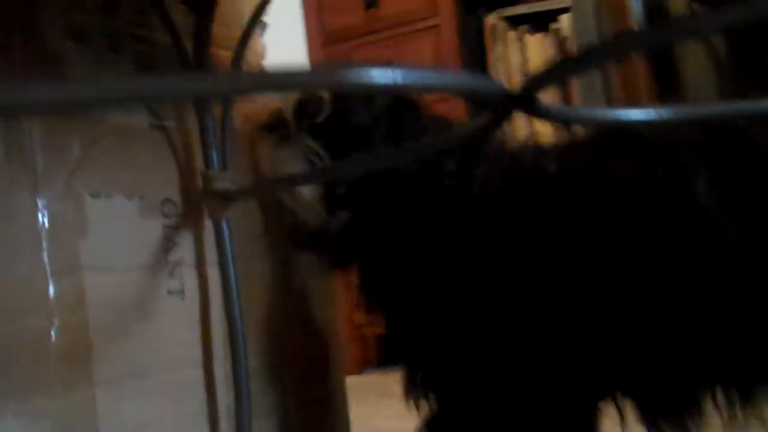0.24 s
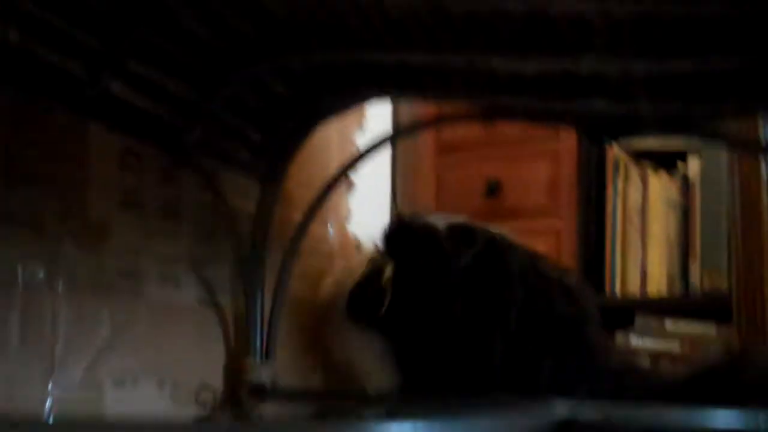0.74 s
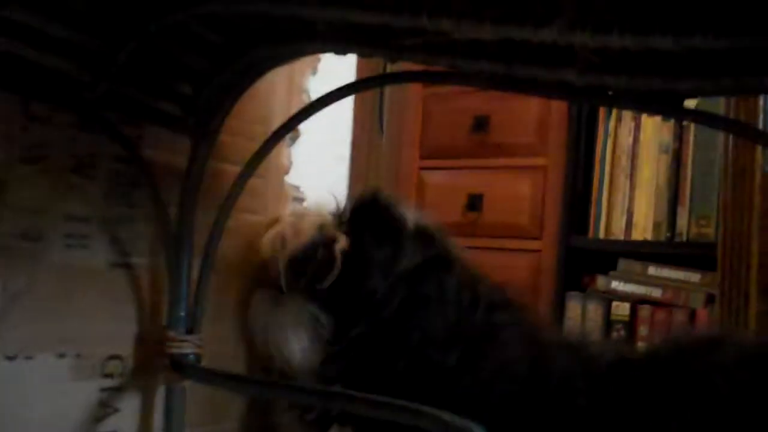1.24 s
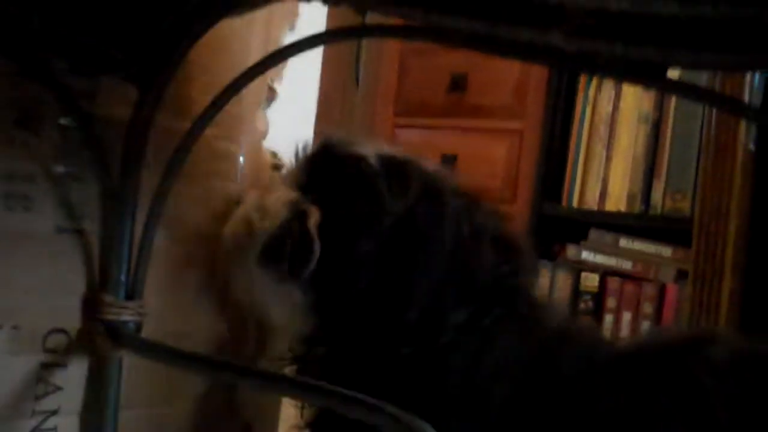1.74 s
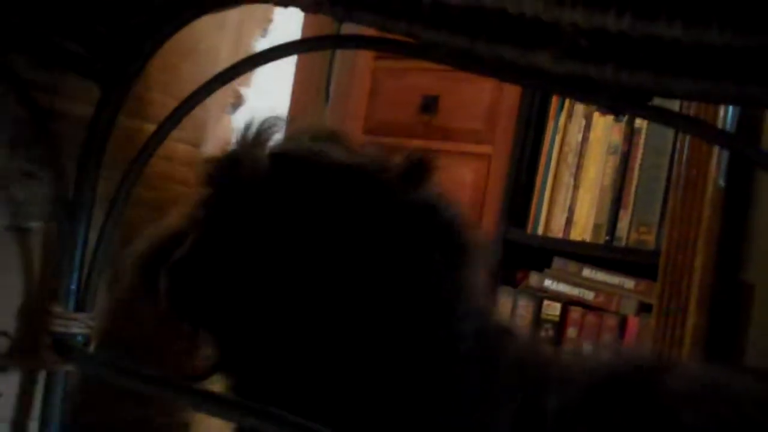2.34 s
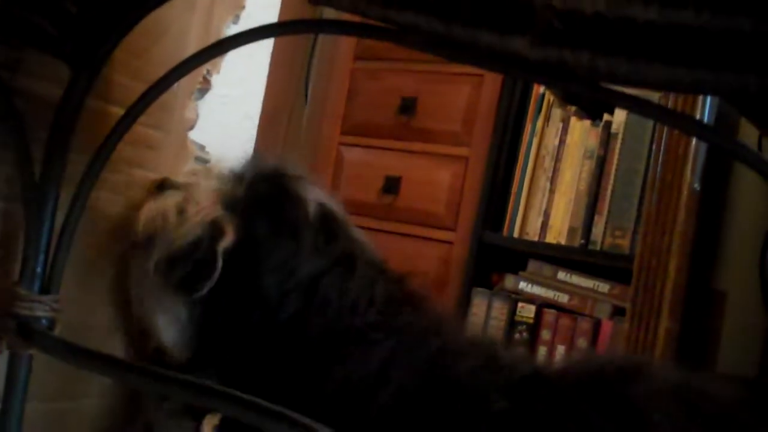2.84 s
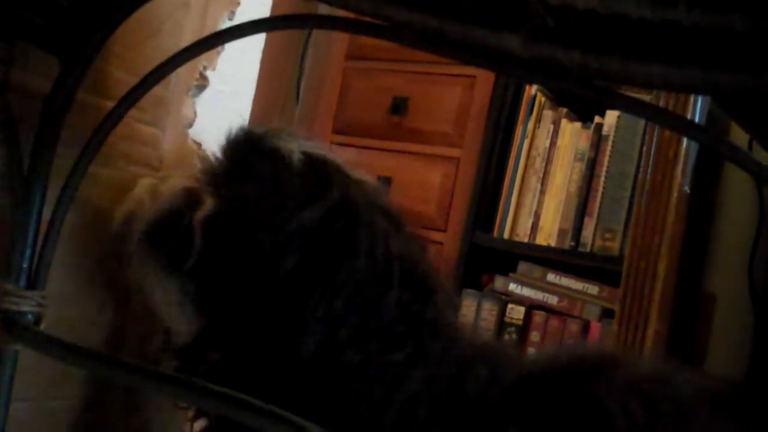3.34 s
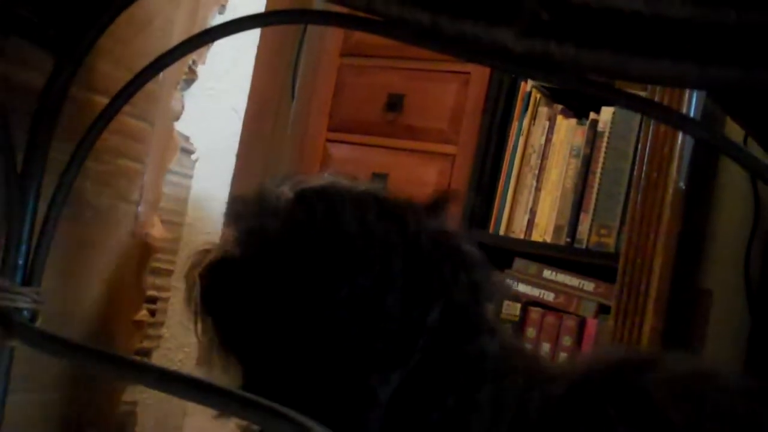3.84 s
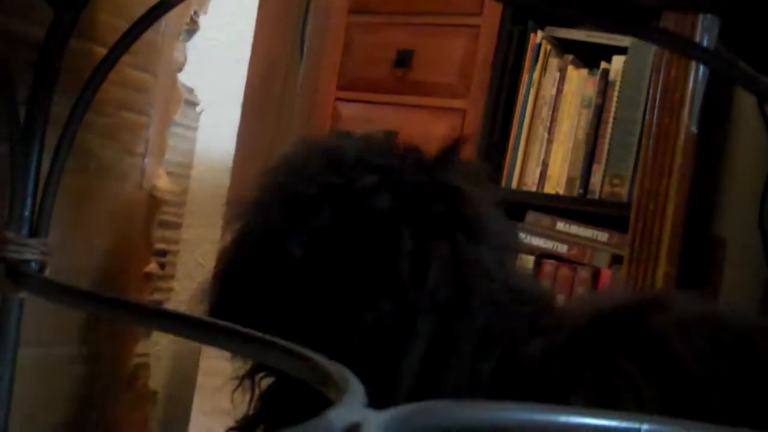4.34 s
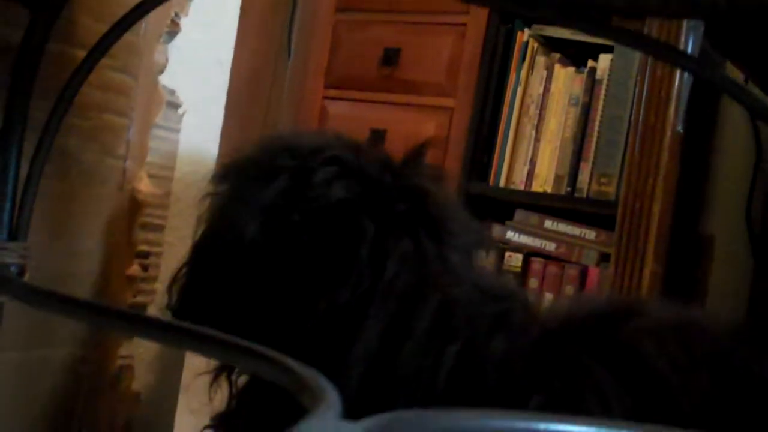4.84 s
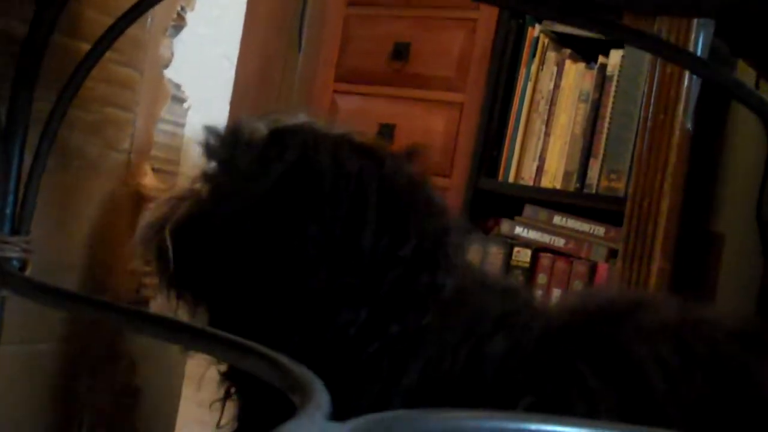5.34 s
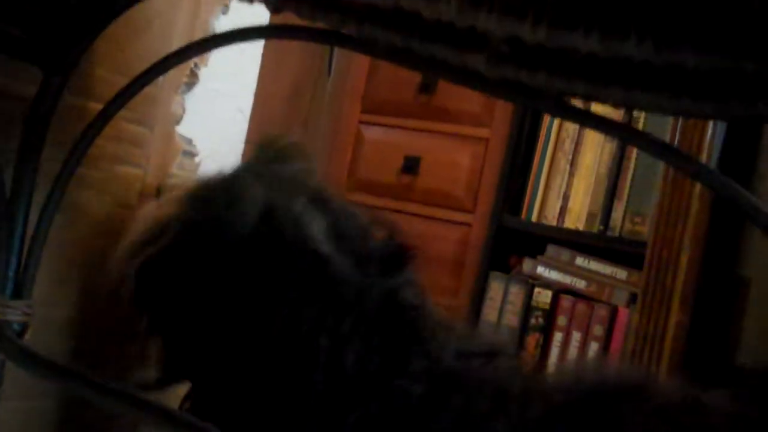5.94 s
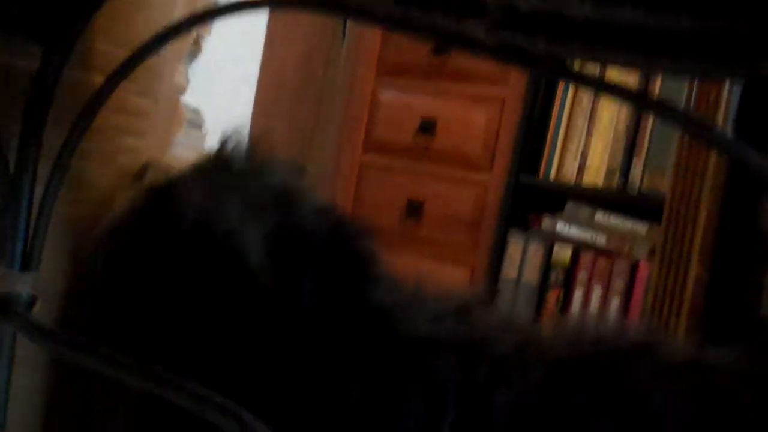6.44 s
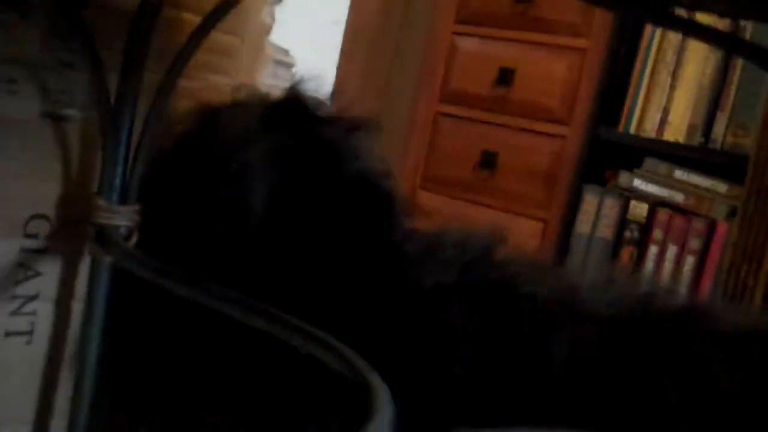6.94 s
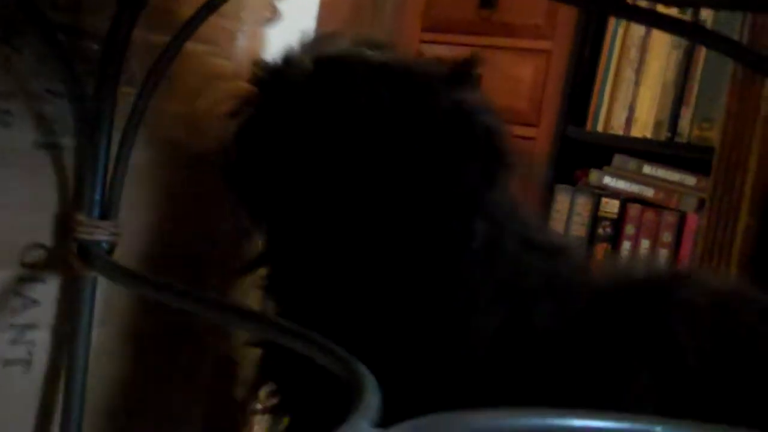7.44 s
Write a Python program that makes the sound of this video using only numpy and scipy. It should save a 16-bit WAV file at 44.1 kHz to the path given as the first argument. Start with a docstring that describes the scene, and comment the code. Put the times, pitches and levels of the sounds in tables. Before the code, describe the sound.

Close, crisp cardboard chewing indoors: bright fibre crackle, short coarse rips, brittle snaps with a brief woody ring, low wall rumble and a few springing panel thuds. Bites are uneven, busiest around two seconds and in the last half second, with only faint ticks through the middle. The room is dry with a very short echo, and the treble-heavy microphones add steady hiss. The box sits slightly left.

```python
"""Puppy chewing a cardboard box

A puppy gnaws and tears at the edge of a big corrugated box in a quiet furnished room, close to two bright,
resonant microphones. Random grains, filtered and driven by the effort of the jaw, make the fibre crackle,
the rips and the rumble of the wall. Noise bursts with short rings make the snapping flutes; decaying sines
make flakes, springing panels and knocks; resonant noise makes rubs. Echoes, room air, hum and hiss surround them."""
import sys
import numpy as np
from scipy import signal
from scipy.fft import rfft, irfft
from scipy.io import wavfile

SR = 44100
rng = np.random.default_rng(int(sys.argv[2]) if len(sys.argv) > 2 else 0)


def generate_wav(signal):
    """Clip the signal to [-1, 1] and save it as 16-bit WAV at the path in sys.argv[1]."""
    frames = np.transpose(np.atleast_2d(signal))
    scaled = np.clip(frames, -1, 1) * 32767
    pcm = np.round(scaled).astype(np.int16)
    wavfile.write(sys.argv[1], SR, pcm)


N = 339113

# bites and pulls on the edge, levels before each layer's trim:
# start_s (of the hold), hold_s, crackle_db, ripping_db, rumble_db
JAW_PULLS = [(0.264, 0.012, -66, -57.5, -62.5), (0.47, 0.024, -48.5, -48, -51),
             (0.688, 0.12, -49.5, -55, -80), (0.939, 0.0073, -39, -48, -50.5),
             (1.049, 0.046, -67, -55, -55.5), (1.466, 0.025, -50, -49.5, -51),
             (1.744, 0.054, -41.5, -49, -60), (1.811, 0.053, -40.5, -48, -54.5),
             (1.937, 0.084, -42, -52, -53.5), (2.103, 0.063, -38, -51.5, -51.5),
             (2.25, 0.018, -39.5, -45, -47), (2.283, 0.076, -26.5, -33.5, -46),
             (2.412, 0.042, -32, -40.5, -45), (2.583, 0.039, -59, -61, -56.5),
             (2.96, 0.051, -50, -57.5, -58), (3.07, 0.097, -52.5, -62.5, -78),
             (3.293, 0.026, -40, -46.5, -66), (3.565, 0.034, -40, -38, -45.5),
             (3.914, 0.076, -53, -69, -85), (4.115, 0.097, -54.5, -66, -82), (4.406, 0.036, -57, -64, -80),
             (4.667, 0.032, -52.5, -61.5, -77), (4.746, 0.098, -57, -74, -84),
             (5.199, 0.034, -51, -70, -81), (6.028, 0.021, -45.5, -55.5, -83),
             (6.129, 0.011, -50.5, -58, -65), (6.469, 0.027, -50, -57.5, -52),
             (6.626, 0.052, -42.5, -58, -58), (6.811, 0.063, -51, -60, -76),
             (6.927, 0.032, -46.5, -52.5, -51), (7, 0.044, -45, -53, -57), (7.18, 0.11, -43, -55.5, -55.5),
             (7.317, 0.043, -41.5, -45.5, -70), (7.381, 0.031, -34.5, -46, -44.5),
             (7.503, 0.13, -43.5, -53, -54.5)]


def from_db(db):
    """Decibels to gain."""
    return 10 ** (np.asarray(db) / 20)


def rms_one(x):
    """Scale to unit power."""
    return x / np.sqrt(np.mean(x ** 2) + 1e-20)


def in_time(rows):
    """Each column of a curve at every sample."""
    s, *columns = np.transpose(rows)
    return [np.interp(np.arange(N) / SR, s, c) for c in columns]


def band(x, low_hz, high_hz, order=2):
    """Causal band-pass, with its edges kept inside the range that the filter allows."""
    edges = np.clip([low_hz, high_hz], 10, .45 * SR)
    return signal.sosfilt(signal.butter(order, edges, "band", fs=SR, output="sos"), x + 1e-18)


def dull(x, hz, order=1):
    """Causal low-pass."""
    return signal.sosfilt(signal.butter(order, min(hz, SR / 2 - 1), fs=SR, output="sos"), x + 1e-18)


def resonance(x, hz, width_hz):
    """Two-pole resonance with gain 1 on top."""
    r = np.exp(-np.pi * width_hz / SR)
    numerator = np.array([1, 0, -1]) * (1 - r * r) / 2
    denominator = [1, -2 * r * np.cos(2 * np.pi * hz / SR), r * r]
    return signal.lfilter(numerator, denominator, x + 1e-18)


def drift(per_s):
    """Smooth random wander of unit power through per_s new points a second."""
    points = rng.standard_normal(N // 20)
    return rms_one(np.interp(np.arange(N) / SR * per_s, np.arange(len(points)), points))


def add(track, s, sound):
    """Mix a sound in at a time in seconds."""
    at = round(s * SR)
    track[at:at + len(sound)] += sound[:N - at]


def grains(per_s, spread_db):
    """Random clicks of either sign, many small and a few large."""
    sizes = from_db(spread_db * np.minimum(rng.exponential(1, N), 4))
    struck = rng.random(N) < per_s / SR
    return struck * sizes * rng.choice([-1, 1], N) / np.sqrt(per_s)


def stillness(air_db=-62.5):
    """Room air is shaped noise, partly shared by both sides; the mains hum is a steady sine."""
    # spectrum of the air before it is set to air_db: pitch_hz, density_db (per Hz)
    air_spectrum = [(20, 4.5), (60, -9.5), (123, -3.5), (160, -7.5), (380, -8.5), (700, -5.5), (1000, -10),
                    (5000, -22), (9000, -61)]
    # mains hum: pitch_hz, level_db (rms)
    hum_tones = [(120, -76)]
    hz = np.maximum(np.arange(N // 2 + 1) * SR / N, 1)
    point_hz, point_db = np.transpose(air_spectrum)
    noise = rng.standard_normal(N) + rng.standard_normal((2, N))
    colour = from_db(np.interp(np.log(hz), np.log(point_hz), point_db))
    air = irfft(rfft(noise) * colour, N)
    t = np.arange(N) / SR
    hum = sum(from_db(db) * np.sqrt(2) * np.sin(2 * np.pi * f * t) for f, db in hum_tones)
    return from_db(air_db) * rms_one(air) + hum


def room(x, wet_db=-14, early_db=-16, onset_s=0.00033, early_s=0.00096, low_db=3.0, low_t60_s=0.2, treble_t60_s=0.32):
    """Echoes: scatter off the box and nearby furniture, then a short tail whose lows both microphones mostly share."""
    t = np.arange(SR // 2) / SR
    shared = rng.standard_normal(len(t))
    sides, scatter = rng.standard_normal((2, 2, len(t)))
    low_fade = np.exp(-np.log(1000) * t / low_t60_s)
    treble_fade = np.exp(-np.log(1000) * t / treble_t60_s)
    lows = from_db(low_db) * band(shared + .5 * sides, 15, 2970) * low_fade
    highs = band(sides, 1350, 19200) * treble_fade
    tail = rms_one((lows + highs) * (1 - np.exp(-t / onset_s)))
    early = rms_one(band(scatter, 2100, 7500) * t * np.exp(-t / early_s))
    echoes = (from_db(wet_db) * tail + from_db(early_db) * early) / np.sqrt(len(t))
    return signal.fftconvolve(x, echoes, axes=1)[:, :N]


def effort(levels_db, gnaw_db, release_s, lag_s=0, attack_s=0.015):
    """Level in dB of one effect of the jaw: light nibbling plus a swell, hold and release for each pull."""
    # nibbling between the pulls: time_s, crackle_db (before the trim)
    nibbling = [(0, -53), (.14, -67.5), (.2, -59.5), (.85, -48.5), (1.3, -57.5), (1.7, -49.5), (2.2, -52.5),
                (3.24, -61), (3.5, -52.5), (3.74, -59), (4.1, -63), (4.55, -75.5), (5.9, -64), (6.23, -66),
                (6.42, -51), (6.78, -62), (7.2, -49), (7.69, -50.5)]
    t = np.arange(N) / SR - lag_s
    power = from_db(in_time(nibbling)[0] + gnaw_db) ** 2
    for (start, hold, *_), db in zip(JAW_PULLS, levels_db):
        before = np.maximum(start - t, 0) / attack_s
        after = np.maximum(t - start - hold, 0) / release_s
        power = power + from_db(db) ** 2 * np.exp(-2 * np.minimum(before + after, 20))
    return 10 * np.log10(power)


def wall(push):
    """The box wall rings in its damped modes."""
    # modes of the wall: pitch_hz, weight_db, t60_s
    wall_modes = [(64, -9.5, 0.16), (121, -14.5, 0.051), (206, -10, 0.029), (384, -17, 0.016),
                  (592, -15.5, 0.024), (1070, -14, 0.025)]
    ringing = 0
    for hz, db, t60 in wall_modes:
        width_hz = np.log(1000) / np.pi / t60
        ringing = ringing + from_db(db) * resonance(push, hz, width_hz) / np.sqrt(width_hz / SR)
    return ringing


def rumbling(jerk_db=3.5, rub_db=-5, sway_db=-1, level_db=-1.0):
    """Small jerks of the jaw shake the wall, sway the whole box and rub it on the floor."""
    jerks = grains(1200, spread_db=2.5) * from_db(jerk_db * drift(40))
    sway = from_db(sway_db) * rms_one(band(jerks, 35, 137))
    rub = from_db(rub_db) * rms_one(band(jerks, 79, 580))
    # the wall follows each pull slightly late and sways on after it
    pulls_db = [db for *_, db in JAW_PULLS]
    shaking_db = effort(pulls_db, gnaw_db=-13.5, release_s=0.057, lag_s=0.0013)
    return from_db(shaking_db + level_db) * rms_one(rms_one(wall(jerks)) + sway + rub)


def buckling(ring_db=-21, crunch=0.63):
    """The wall pops inwards: one short suck of air, roughened by creasing, then its modes ring."""
    # pops of the wall, before filtering: start_s, push_db, rise_s (time to the peak of the push)
    wall_pops = [(0.272, -38, 0.00019), (0.939, -25.5, 0.00055), (1.078, -34, 0.00019),
                 (1.612, -32, 0.00084), (1.91, -26.5, 0.00049), (2.165, -36, 0.00037),
                 (2.394, -34.5, 0.0017), (3.542, -36, 0.001), (3.557, -27.5, 0.00077),
                 (6.956, -30.5, 0.00012), (7.244, -26, 0.00041), (7.388, -19.5, 0.00039),
                 (7.401, -29, 0.00022)]
    push, t = np.zeros(N), np.arange(SR // 30) / SR
    creases = rng.standard_normal((len(wall_pops), len(t)))
    for (s, db, rise_s), crease in zip(wall_pops, creases):
        suck = -from_db(db) * t / rise_s * np.exp(1 - t / rise_s)
        add(push, s, suck * (1 + crunch * crease))
    return band(push, 187, 1600, order=1) + from_db(ring_db) * wall(push)


def thuds(cycles=1.22, taut=0.28):
    """A released panel swings for a few cycles; it starts taut and sharp, and its pitch sags as it slackens."""
    # flaps and panels springing back: start_s, level_db (of the swing at its start), slack_pitch_hz
    panels = [(.497, -40.5, 98), (1.617, -31.5, 195), (3.626, -44, 58), (6.4636, -35, 610),
              (6.505, -40.5, 58.4), (7.246, -32.5, 188), (7.401, -26.5, 116), (7.4735, -35.5, 192)]
    out, t = np.zeros(N), np.arange(SR // 4) / SR
    for s, db, hz in panels:
        swing = np.exp(-hz * t / cycles)
        phase = 2 * np.pi * np.cumsum(hz * (1 + taut * swing)) / SR
        add(out, s, from_db(db) * swing * np.sin(phase))
    return out


def rubs(rise_per_s=1.86, judder_db=2.2):
    """Board dragged over board or teeth sings for a moment at a rough pitch, which rises as the pull tightens."""
    # sticking and slipping, from groans and scrapes to squeaks:
    # middle_s, half_length_s, pitch_hz (at the middle), level_db, width_hz (of the narrower resonance)
    strokes = [(0.564, 0.066, 209, -53, 110), (1.559, 0.0062, 1830, -47.5, 1100),
               (1.601, 0.048, 190, -55, 160), (2.949, 0.028, 1360, -56, 90), (4.143, 0.013, 3700, -62, 800),
               (7.42, 0.018, 1400, -44.5, 1000)]
    t, out = np.arange(N) / SR, np.zeros(N)
    for s, length, hz, db, width_hz in strokes:
        judder = from_db(judder_db * drift(90))
        stroke = np.exp(-((t - s) / length) ** 2)
        tone = resonance(resonance(rng.standard_normal(N), hz, width_hz), hz, 2 * width_hz)
        # reading the tone ever faster makes its pitch climb
        rising = np.interp(t + rise_per_s / 2 * (t - s) ** 2, t, tone)
        out += from_db(db) * rms_one(stroke * judder * rising) * np.sqrt(np.mean(stroke ** 2))
    return out


def clacks(chatter=0.34, chatter_s=0.0034):
    """The released edge chatters against the teeth and gives a dull, woody knock, different each time."""
    # teeth slipping off the stiff edge: start_s, level_db (before the weight of each mode)
    slips = [(1.7465, -42.5), (1.78, -31), (2.794, -41), (3.3136, -34), (3.567, -31), (7.4003, -16)]
    # modes of that edge: pitch_hz, weight_db, t60_s
    edge_modes = [(684, -6, 0.011), (1000, -6.5, 0.016), (1254, -1, 0.018), (1440, -0.5, 0.0091)]
    out, t = np.zeros(N), np.arange(SR // 10) / SR
    hz, mode_db, t60 = np.transpose(edge_modes)[:, :, None]
    modes = np.exp(-np.log(1000) * t / t60) * np.sin(2 * np.pi * hz * t)
    chances = rng.standard_normal((len(slips), len(edge_modes), len(t)))
    for (s, db), chance in zip(slips, chances):
        contact = (t == 0) + chatter * chance * np.exp(-t / chatter_s)
        rings = signal.fftconvolve(contact, modes, axes=1)[:, :len(t)]
        # the chatter varies the colour, while each mode keeps its strength
        rings = rings * modes.std(axis=1, keepdims=True) / rings.std(axis=1, keepdims=True)
        add(out, s, np.sum(from_db(db + mode_db) * rings, axis=0))
    return band(out, 350, 6000)


def snaps(rise_s=0.00011, crack_s=0.00034, splinter_s=0.0045, splinter_db=-20, ring_width=0.48,
          crack_trim_db=-8.0, octave_db=-5, thin_hz_per_db=55):
    """A snap is a split-second burst of breaking fibres; the board around it rings for a few cycles
    in two resonances an octave apart. The less board takes part, the higher the crack."""
    # flutes and liner snapping, levels over 1 ms:
    # start_s, crack_db (before the trim), board_ring_db, ring_pitch_hz (of the upper resonance)
    breaking_flutes = [(0.0228, -38.5, -61, 2800), (0.248, -36, -53, 2470), (0.2701, -43, -37.5, 2440),
                       (0.2975, -40.5, -59, 2860), (0.7067, -31.5, -31, 3360), (0.9515, -32, -70, 2300),
                       (0.9892, -38.5, -40, 1910), (1.0739, -47, -39.5, 1680), (1.2085, -38, -48, 2200),
                       (1.6137, -32.5, -36.5, 1740), (1.6674, -36.5, -41.5, 2550),
                       (1.758, -22.5, -28, 2560), (1.775, -23, -25, 3180), (1.7816, -18, -22.5, 2650),
                       (1.911, -24.5, -38.5, 2130), (2.0943, -32.5, -51, 2600), (2.2422, -31, -36, 3150),
                       (2.256, -24, -36.5, 2870), (2.283, -37, -50, 2700), (2.288, -40, -32, 4200),
                       (2.309, -35, -53, 3200), (2.5825, -39.5, -60, 2600), (3.1355, -41, -53.5, 3200),
                       (3.28, -35, -46, 2800), (3.3133, -18, -26, 2480), (3.369, -42, -55, 2800),
                       (3.5446, -47, -34.5, 2290), (3.5593, -46, -25.5, 1930), (3.5652, -19.5, -26, 3100),
                       (3.5806, -36, -31.5, 2280), (3.6236, -41, -37.5, 2200), (3.806, -31, -68, 2720),
                       (3.8317, -27.5, -69, 3200), (3.9172, -42.5, -56, 2900), (3.9832, -37, -73, 2780),
                       (4.0165, -48, -53, 2500), (4.056, -46, -49, 3060), (4.0967, -34.5, -61, 2700),
                       (4.1054, -46, -53, 3500), (4.1338, -42, -48.5, 2270), (4.165, -36, -63, 3000),
                       (4.676, -31, -51.5, 2920), (5.029, -45.5, -49, 3420), (5.1109, -34, -39, 2920),
                       (5.2666, -40.5, -70, 1700), (5.826, -41, -49.5, 3340), (5.8512, -43, -76, 2800),
                       (6.0293, -38, -47.5, 2850), (6.304, -46, -45, 3380), (6.4846, -46, -42.5, 2650),
                       (6.6184, -37, -41, 2300), (6.636, -31, -70, 3230), (6.6682, -30, -36, 3330),
                       (6.6756, -34.5, -38, 2600), (6.916, -39, -51, 3430), (7.218, -33, -46, 3120),
                       (7.245, -9, -21, 3400), (7.3999, -24, -20, 2440), (7.42, -25.5, -39, 2200),
                       (7.4745, -17, -26.5, 2760)]
    out, t, one_ms = np.zeros(N), np.arange(SR // 50) / SR, SR / 1000
    decay = np.exp(-t / crack_s) + from_db(splinter_db) * np.exp(-t / splinter_s)
    shape = (1 - np.exp(-t / rise_s)) * decay
    noises = rng.standard_normal((len(breaking_flutes), 2, len(t)))
    for (s, db, board_db, hz), (crack_noise, board_noise) in zip(breaking_flutes, noises):
        burst = shape * crack_noise
        thin_hz = thin_hz_per_db * np.clip(db - board_db - 17.5, 0, 20)
        crack = band(resonance(burst, 6110 + thin_hz, 1280) + 0.13 * burst, 4740 + thin_hz, 19845)
        upper, lower = (rms_one(resonance(shape * board_noise, f, ring_width * f)) for f in (hz, hz / 2))
        ring = band(upper + from_db(octave_db) * lower, 700, 4800)
        snap = from_db(db + crack_trim_db) * rms_one(crack) + from_db(board_db) * rms_one(ring)
        add(out, s, snap * np.sqrt(one_ms / len(t)))
    return out


def tear_levels(release_s=0.016, gnaw_rip_db=-7):
    """Crackle and ripping in dB, following the jaw; a yank lifts both for an instant."""
    # sudden yanks that rip through several flutes at once: middle_s, half_length_s, lift_db
    sudden_yanks = [(0.515, 0.0049, 14.5), (3.563, 0.0048, 14)]
    t = np.arange(N) / SR
    _, _, fine_db, coarse_db, _ = np.transpose(JAW_PULLS)
    lift_db = sum(db * np.exp(-((t - s) / length) ** 2) for s, length, db in sudden_yanks)
    crackle_db = effort(fine_db, 0, release_s) + lift_db
    ripping_db = effort(coarse_db, gnaw_rip_db, release_s) + lift_db
    return crackle_db, ripping_db


def flicks(per_s=190, spread_db=2.5, flick_db=4.5, low_hz=1900, high_hz=6000, loose_cycles=4, stray_cycles=1.68):
    """Flakes tick as decaying sines, louder with a harder pull up to a ceiling, where the rip drowns them."""
    # loose flakes of liner flicking free: start_s, level_db (of the ring at its start), pitch_hz
    loose_flakes = [(.577, -44, 1620), (.7072, -58, 1630), (1.517, -39, 2440), (2.614, -41, 1860),
                    (4.1323, -33.5, 3840), (5.1096, -45, 1480), (5.1125, -32, 2790), (5.148, -46.5, 1310)]
    out, t = np.zeros(N), np.arange(SR // 100) / SR
    ripping_db = np.minimum(tear_levels()[1], -46)
    chance, pitch = rng.random((2, N))
    size = np.minimum(rng.exponential(1, N), 3)
    strays = []
    for i in np.flatnonzero(chance < per_s / SR):
        stray_db = ripping_db[i] + flick_db + spread_db * size[i]
        strays.append((i / SR, stray_db, low_hz * (high_hz / low_hz) ** pitch[i]))
    # a ring falls to 1/e in this many cycles; flakes still caught in the rip die sooner
    for flakes, cycles in (loose_flakes, loose_cycles), (strays, stray_cycles):
        for s, db, hz in flakes:
            add(out, s, from_db(db) * np.exp(-hz * t / cycles) * np.sin(2 * np.pi * hz * t))
    return out


def tearing(fine, coarse, per_s=2700, spread_db=2.5, flute_db=3.0, tug_db=2.1, fine_trim_db=-10.5):
    """Fibres break in clumps, flute after flute, with stray ticks; a harder pull breaks more of them each second."""
    pull = from_db((fine + 50) / 2)     # 1 at a crackle level of -50 dB before the trim
    clumps = from_db(flute_db * drift(300) + tug_db * drift(60))
    # under a light pull single ticks stand out; under a hard one they drown in the rip
    ticks = .85 * rms_one(grains(75, spread_db=2.8)) / np.sqrt(np.maximum(pull, .6))
    breaks = rms_one(clumps * grains(per_s * pull, spread_db)) + ticks
    # the glued layers part with a duller sound, heard in the rip alone
    splits = rms_one(clumps * grains(per_s * pull, spread_db))
    crackle = rms_one(dull(band(breaks, 5100, 19845), 1570))
    rip = rms_one(band(breaks + splits, 500, 7400, order=1))
    return from_db(fine + fine_trim_db) * crackle + from_db(coarse) * dull(rip, 6740, order=2)


def scene(apart=1.0):
    """The box in its room; fibres break all along the edge, so each microphone hears a partly different crackle."""
    levels = tear_levels()
    shared = tearing(*levels)
    sides = np.array([tearing(*levels), tearing(*levels)])
    crackle = (shared + apart * sides) / np.sqrt(1 + apart ** 2)
    box = crackle + flicks() + snaps() + clacks() + rubs() + buckling() + thuds() + rumbling()
    return box + room(box) + stillness()


def microphones(x, left_peak_db=16.0, right_peak_db=13.0, port_noise_db=-76, hiss_db=-62.5):
    """Each capsule sits behind a port with its own treble resonance, loses deep bass and hisses;
    the box is slightly left."""
    x = x - dull(x, 50)
    x = x + from_db(port_noise_db) * rng.standard_normal((2, N))    # noise that the ports colour
    left_port = resonance(x[0], 7600, 1100)
    right_port = resonance(x[1], 6300, 1100)
    left = dull(x[0] + from_db(left_peak_db) * left_port, 13500, order=2)
    right = dull(x[1] + from_db(right_peak_db) * right_port, 8500, order=2)
    balance = from_db([[.9], [-.9]])
    return balance * np.array([left, right]) + from_db(hiss_db) * rng.standard_normal((2, N))


def record(dry, cutoff_hz=14300):
    """Microphone colour, overload at full scale, and the top cut off steeply."""
    loud = np.clip(microphones(dry), -1, 1)
    return signal.sosfilt(signal.ellip(10, .1, 70, cutoff_hz, fs=SR, output="sos"), loud)


dry = scene()
out = record(dry)
generate_wav(out)
```